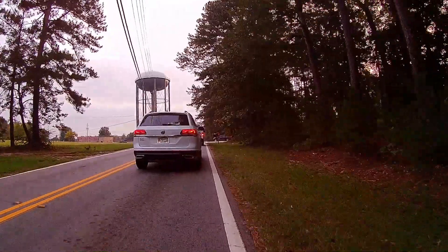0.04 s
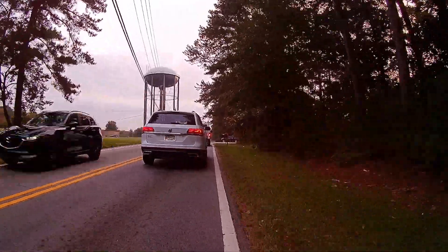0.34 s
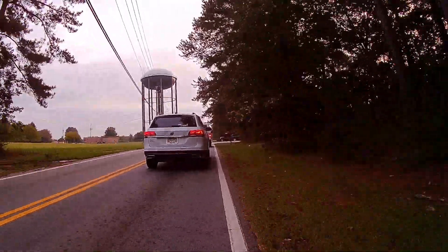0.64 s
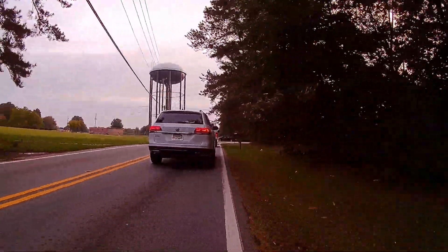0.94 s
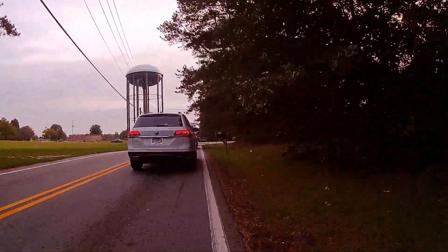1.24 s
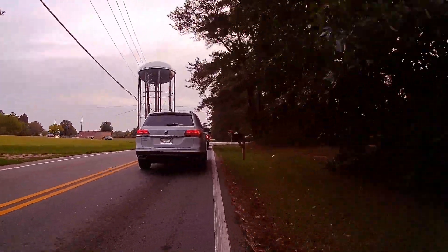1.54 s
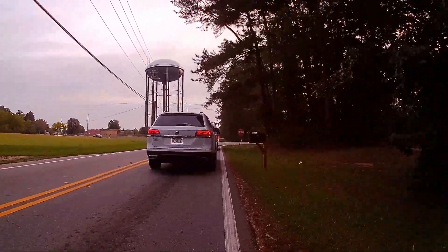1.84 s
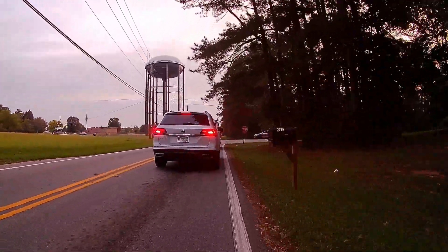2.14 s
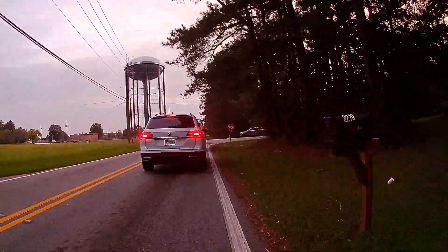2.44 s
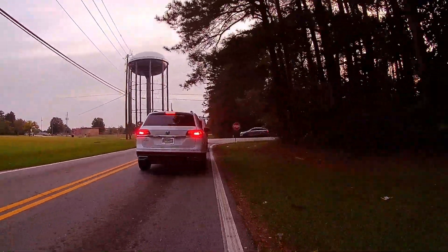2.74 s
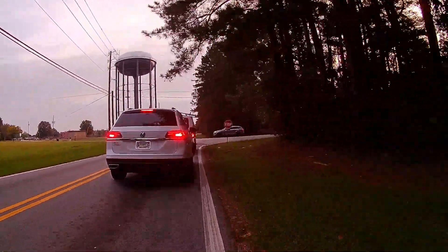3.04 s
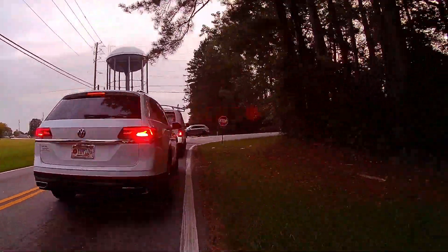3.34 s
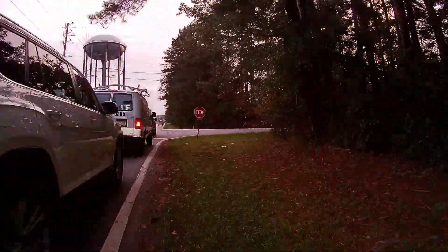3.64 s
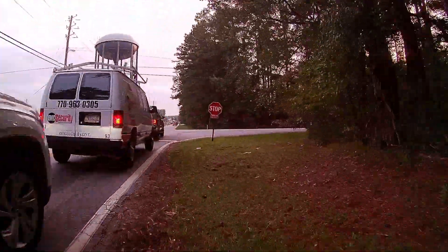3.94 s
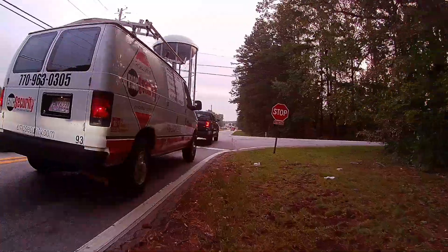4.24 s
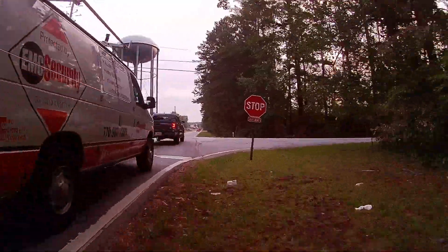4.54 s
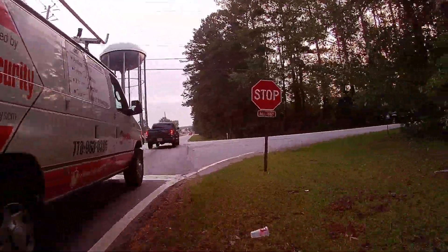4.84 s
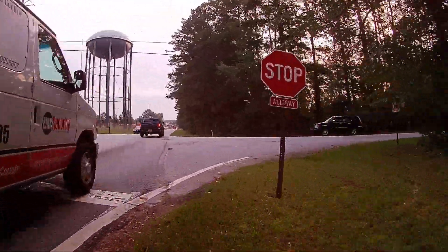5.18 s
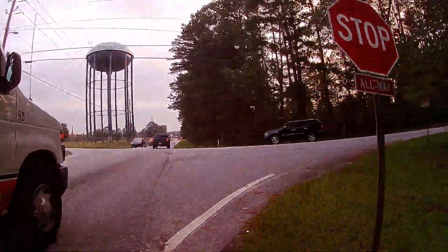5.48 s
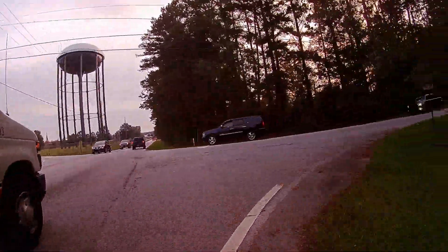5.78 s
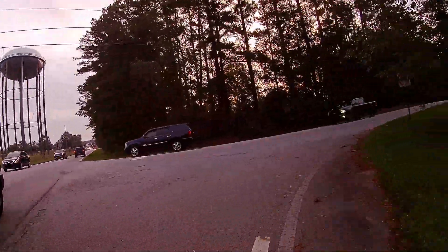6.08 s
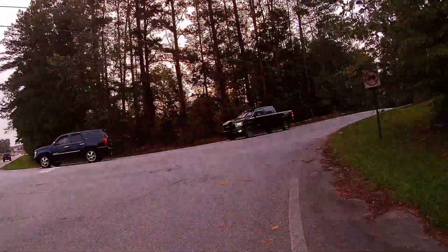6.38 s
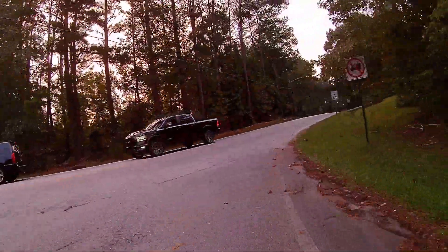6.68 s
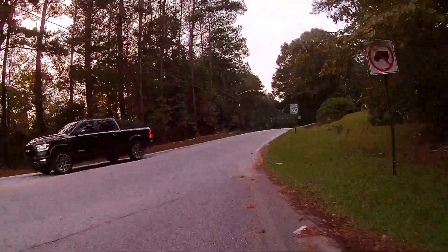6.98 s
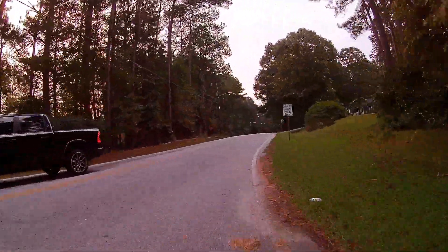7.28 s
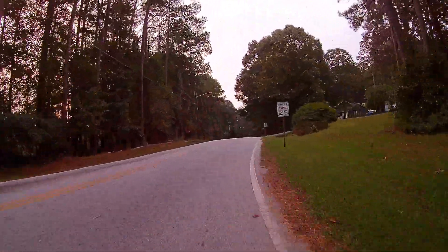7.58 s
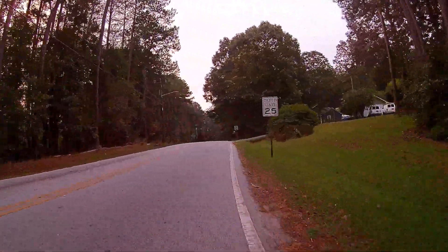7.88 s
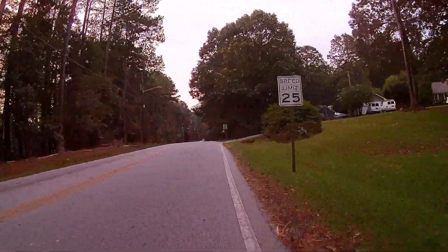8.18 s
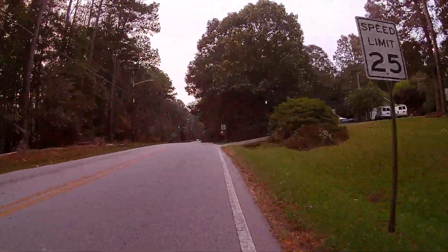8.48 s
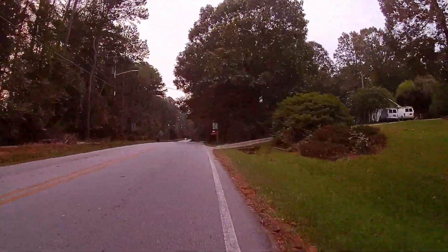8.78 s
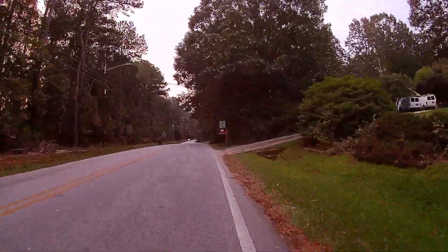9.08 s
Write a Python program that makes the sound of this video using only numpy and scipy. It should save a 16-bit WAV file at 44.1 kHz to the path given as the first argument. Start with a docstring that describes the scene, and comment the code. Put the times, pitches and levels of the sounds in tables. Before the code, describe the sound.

Wind rumbles on the microphone of a rolling bicycle that knocks and rattles over bumps, with tyres humming and cars idling low nearby.

```python
"""Wind buffets a microphone on a rolling bicycle, over the low shaking of the frame and the hum of tyres.
Road grain drives the frame, grit ticks against it, and the camera case knocks amid short bright clicks.
The bicycle slows, coasts over a grass verge past idling cars with its freewheel rattling, then
speeds up on asphalt. Far tyres wash, a distant bird chirps, and a fast limiter flattens each swell."""
import sys
import numpy as np
from scipy import signal
from scipy.fft import rfft, irfft, next_fast_len
from scipy.io import wavfile
from scipy.ndimage import uniform_filter1d

SR = 44100
rng = np.random.default_rng(int(sys.argv[2]) if len(sys.argv) > 2 else 0)


def master(y):
    """Save y as 16-bit WAV."""
    cut = np.clip(np.atleast_2d(y).T, -1, 1)
    pcm = np.round(cut * 32767)  # scale
    wavfile.write(sys.argv[1], SR, pcm.astype(np.int16))


N = 406595
TIME = np.arange(N) / SR
CRUISE_HZ = 154   # tread rate at cruising speed
# Resonances of the camera case. Each row: frequency in Hz, gain in dB, 60 dB decay time in seconds.
CASE_MODES = [(350, -8, .02), (790, -1.5, 0.019), (879, 8, 0.023), (1378, 10.5, 0.013), (1454, 4, 0.029),
              (2010, -8, 0.02), (2450, -15, 0.012), (2900, -16, 0.027), (4600, -20.5, 0.024)]


def from_db(db):
    """Decibels to amplitude ratio."""
    return 10 ** (np.asarray(db) / 20)


def rms_one(x):
    """Scale to unit rms."""
    return x / np.sqrt(np.mean(x ** 2) + 1e-20)


def loudest_one(x):
    """Scale a burst so that its loudest three milliseconds have unit rms."""
    return x / np.sqrt(uniform_filter1d(x ** 2, 132).max())


def in_time(rows):
    """Interpolate each column of a curve at every sample."""
    s, *columns = np.transpose(rows)
    return [np.interp(TIME, s, c) for c in columns]


def swells(rows):
    """Summed power of bell-shaped swells, each at half power at the edges of its width."""
    return sum(from_db(db) ** 2 * 2 ** -((2 * (TIME - s) / width) ** 2) for s, width, db in rows)


def scatter(shape):
    """Gaussian draws limited to two standard deviations."""
    return np.clip(rng.standard_normal(shape), -2, 2)


def drift(corner_hz):
    """Low-passed random fluctuation of unit rms."""
    hz = np.arange(N // 2 + 1) * SR / N
    return rms_one(irfft(rfft(rng.standard_normal(N)) / (1 + (hz / corner_hz) ** 4), N))


def coloured(x, spectrum):
    """Filter by a spectral envelope that rolls off beyond its ends; unit rms."""
    hz, db = np.transpose(spectrum)
    size = next_fast_len(N + SR // 4)
    bins = np.maximum(np.arange(size // 2 + 1) * SR / size, 1)
    gain = from_db(np.interp(np.log(bins), np.log(hz), db))
    skirts = np.minimum(1, bins / hz[0]) * np.minimum(1, hz[-1] / bins) ** 2
    return rms_one(irfft(rfft(x, size) * gain * skirts, size)[:N])


def noise(spectrum):
    """Coloured Gaussian noise of unit rms."""
    return coloured(rng.standard_normal(N), spectrum)


def evened(x, seconds):
    """Steady a noise by dividing it by its running rms."""
    size = max(int(seconds * SR), 1)
    return x / np.sqrt(uniform_filter1d(uniform_filter1d(x ** 2, size), size) + 1e-9)


def ring(force, modes):
    """Modal response: each mode is a damped harmonic oscillator."""
    out = 0
    for hz, db, t60 in modes:
        r, w = np.exp(-np.log(1000) / (t60 * SR)), 2 * np.pi * hz / SR
        out += from_db(db) * signal.lfilter([0, np.sin(w)], [1, -2 * r * np.cos(w), r * r], force + 1e-18)
    return out


def decaying(impulses, seconds):
    """Give each impulse an exponential tail."""
    return signal.lfilter([1], [1, -np.exp(-1 / (seconds * SR))], impulses + 1e-18)


def cut(x, hz, kind, order=2):
    """Causal low-pass or high-pass."""
    return signal.sosfilt(signal.butter(order, hz, kind, fs=SR, output="sos"), x)


def add(out, s, sound):
    """Mix a short sound in at s seconds."""
    at = int(s * SR)
    out[at:at + len(sound)] += sound[:N - at]


def tread_hz():
    """Tread blocks meet the ground at a rate proportional to speed."""
    # Each row: time in seconds, tread rate in Hz.
    speed = [(0, 155.4), (1.05, 148.9), (2, 139), (2.7, 132.6), (3.4, 133.6), (4.9, 120), (5.65, 90.1),
             (6.0, 116.3), (6.5, 129.3), (7.1, 155.5), (7.9, 167.9), (8.4, 179), (8.85, 182.1), (9.22, 192)]
    return in_time(speed)[0]


def on_grass(start_s=3.58, end_s=5.86, entry_s=0.26, exit_s=0.29):
    """Crossfade of the ground: 0 on asphalt, 1 on the verge."""
    return np.clip(.5 + np.minimum((TIME - start_s) / entry_s, (end_s - TIME) / exit_s), 0, 1)


def rolling(cruise_db, doubling_db, grass_db=0):
    """Gain of a rolling noise: a power law of speed, cushioned by grass."""
    return from_db(cruise_db + doubling_db * np.log2(tread_hz() / CRUISE_HZ) + grass_db * on_grass())


def wind(headwind_db=-52.5, buffet_gain_db=5.0, flutter_hz=1.2):
    """Turbulent pressure: eddies push on the microphone while the frame shakes at its low resonance."""
    # Spectra of the eddies and the frame. Each row: frequency in Hz, relative density in dB.
    buffet_spectrum = [(8, -16), (16, 6.5), (26, 1), (32, 1), (39, 10.5), (47, -1), (70, -28.5),
                       (150, -56.5)]
    shake_spectrum = [(25, -27), (40, -29), (48, -6), (54, -1), (60, -5.5), (72, -11.5), (90, -21),
                      (160, -50.5)]
    # Each row: centre in seconds, width in seconds, relative level in dB.
    gusts = [(0.45, 1.5, -45), (1.1, 0.21, -44.5), (3.6, 0.33, -37), (4.8, 1.02, -35.5), (6.1, 0.28, -38.5),
             (7.55, 1.4, -41), (8.25, 0.29, -53.5), (9.2, 0.23, -35.5)]
    # Each row: time in seconds, mean level of the frame's shaking in dB.
    shaking = [(0, -36), (0.6, -35.5), (0.95, -29), (1.3, -41), (2.1, -38), (2.9, -36.5), (3.3, -38),
               (5.6, -39), (6.1, -34.5), (6.45, -34), (7.2, -34), (7.8, -34), (8.8, -30.5), (9.22, -38)]
    strength = np.sqrt(from_db(headwind_db) ** 2 + swells(gusts))
    shake_db, = in_time(shaking)
    buffet = evened(noise(buffet_spectrum), seconds=0.25)
    shake = evened(noise(shake_spectrum), seconds=0.15)
    buffet *= strength * from_db(buffet_gain_db + drift(flutter_hz))
    shake *= from_db(shake_db + 1.5 * drift(flutter_hz))
    return buffet + shake


def grit(per_s, spread_db, clump_db):
    """Shot noise: tiny random impacts of the road grain, their strength swelling in clumps."""
    impacts = (rng.random(N) < per_s / SR) * rng.standard_normal(N)
    return impacts * from_db(spread_db * rng.standard_normal(N) + clump_db * drift(72))


def road():
    """Forced vibration: road grain drives the frame and hollow camera case, harder on rough ground."""
    # Three bands of vibration. Each row: frequency in Hz, relative density in dB.
    rumble_spectrum = [(55, -22), (85, -4), (115, -1.5), (160, -1), (210, -8), (280, -21), (500, -43.5)]
    drone_spectrum = [(150, -15.5), (210, -9), (255, -2.5), (295, -5), (335, -1.5), (375, -6.5),
                      (425, -9.5), (480, -21), (600, -29.5), (900, -26), (2000, -74.5)]
    buzz_spectrum = [(400, -17), (620, -16.5), (740, 0), (840, 5), (930, -16), (1050, -5), (1350, -2.5),
                     (1650, -4.5), (1850, -23), (2250, -25), (2600, -35), (3200, -40), (3750, -39),
                     (4200, -51), (5000, -41.5), (9000, -52.5)]
    # Each row: centre in seconds, width in seconds, added vibration in dB relative to smooth road.
    rough_patches = [(3.05, 1, -1.5), (4.6, 0.7, 3.5), (5.15, 0.57, 5), (8.55, 0.27, 3.5)]
    rumble = evened(noise(rumble_spectrum), seconds=0.83)
    drone = evened(coloured(grit(3000, spread_db=2.5, clump_db=2.5), drone_spectrum), seconds=0.49)
    buzz = evened(coloured(grit(2500, spread_db=-0.5, clump_db=3.5), buzz_spectrum), seconds=0.096)
    rumble *= rolling(cruise_db=-47.5, doubling_db=5, grass_db=-7.5)
    drone *= rolling(cruise_db=-41.5, doubling_db=14, grass_db=-2.4)
    buzz *= rolling(cruise_db=-56.5, doubling_db=13, grass_db=-2)
    return np.sqrt(1 + swells(rough_patches)) * (rumble + drone + buzz)


def tyre_hum(wobble=0.02, rough=0.4, swell_db=2.0):
    """Periodic tread impacts make a tone; uneven asphalt modulates it and grass silences it."""
    # Each row: time in seconds, relative levels of the fundamental and of its octave in dB.
    hum_levels = [(0, -47.5, -65), (0.85, -46, -64), (1, -37.5, -55.5), (1.3, -51.5, -52.5),
                  (1.45, -37, -55), (2.0, -39.5, -44), (2.12, -48.5, -49.5), (2.5, -45, -54.5),
                  (3.05, -50, -48.5), (3.4, -51.5, -57), (6.45, -53.5, -59), (6.7, -45.5, -59.5),
                  (7.2, -46.5, -58.5), (7.7, -48.5, -66), (7.9, -46.5, -54), (8.6, -35, -44.5),
                  (9.22, -38, -62)]
    first_db, octave_db = in_time(hum_levels)
    phase = 2 * np.pi * np.cumsum(tread_hz() * (1 + wobble * drift(18.95))) / SR
    first_gain = from_db(first_db - 1 + swell_db * drift(4.5))
    sidebands = rough * (drift(16) * np.cos(phase) + drift(27) * np.sin(phase))
    first = first_gain * (np.sin(phase) + sidebands)
    octave = from_db(octave_db + 4.5) * (1 + rough * drift(23)) * np.sin(2 * phase)
    return np.sqrt(2) * (first + octave) * (1 - on_grass())


def crunch(snaps_per_s=45, spread_db=6.5, snap_s=0.0046, rustle=0.09):
    """Brittle fracture: stalks and gravel snap under the tyres in noise bursts over a steady rustle."""
    # Each row: frequency in Hz, relative density in dB.
    spectrum = [(900, -2.5), (2000, 10), (2700, 4.5), (4200, -4), (5500, -9.5), (7000, -12), (10000, -18.5),
                (15000, -17)]
    # Patches of twigs and gravel. Each row: centre in seconds, width in seconds, level in dB.
    litter = [(4.1, 0.15, -62), (4.57, 0.58, -63), (2.7, 0.56, -80), (5.28, 0.12, -69)]
    dust = rolling(cruise_db=-77.5, doubling_db=14, grass_db=-1)
    strength = np.sqrt(dust ** 2 + swells(litter))
    snaps = (rng.random(N) < snaps_per_s / SR) * from_db(spread_db * scatter(N))
    envelope = decaying(snaps, snap_s) + rustle
    return strength * evened(envelope * noise(spectrum), seconds=1.0)


def engines(firing_hz=46, at_one_metre_db=-39, slope_db=-21.5):
    """Idling cars hum at harmonics of their firing rate, weakened by spherical spreading."""
    # Each row: time in seconds, distance to the nearest engine in metres.
    distances = [(0, 21), (3, 12), (4.6, 1.5), (5.6, 2.7), (7, 18), (9.22, 16)]
    metres, = in_time(distances)
    phase = 2 * np.pi * np.cumsum(firing_hz * (1 + 0.016 * drift(0.94))) / SR
    hum = sum(from_db(slope_db * np.log2(k) + 2 * drift(3.1)) * np.sin(k * phase) for k in range(1, 7))
    return from_db(at_one_metre_db) * rms_one(hum) / metres


def far_traffic():
    """The tyres of far cars sum incoherently to a steady wash."""
    # Each row: frequency in Hz, relative density in dB.
    spectrum = [(300, 1.5), (600, -9.5), (830, 4.5), (1050, -8), (1550, -4.5), (1900, -20), (4000, -30)]
    return from_db(-64) * noise(spectrum)


def hiss():
    """Stationary broadband noise forms a faint floor."""
    # Each row: frequency in Hz, relative density in dB.
    spectrum = [(100, -2.5), (2000, -6), (4000, -14.5), (8000, -16.5), (15000, -11.5)]
    return from_db(-82) * noise(spectrum)


def stones(per_s=22, spread_db=5.5, large_gain_db=8.0, skitter=0.1, skitter_s=.002):
    """Impulse excitation: grains flung off the tyres tick, skitter on the frame and ring the case."""
    # Each row: time in seconds, relative strength in dB.
    large_stones = [(0.143, -50), (0.258, -51.5), (0.663, -53), (0.817, -48.5), (1.164, -51.5),
                    (1.278, -53), (1.73, -49), (1.773, -46), (2.012, -49), (2.107, -54), (2.181, -54),
                    (6.554, -48), (6.687, -49), (6.922, -56.5), (7.328, -50), (7.36, -50), (7.625, -43.5),
                    (7.668, -44.5), (7.872, -50), (7.935, -57), (8.089, -45.5), (8.129, -47.5),
                    (8.322, -49.5), (8.672, -45), (8.765, -51), (8.886, -48), (9.042, -46.5),
                    (9.179, -39.5)]
    # Resonances they strike. Each row: frequency in Hz, gain in dB, 60 dB decay time in seconds.
    modes = [(2240, -16.5, 0.021), (3800, -21.5, 0.01), (4700, -22, 0.0061)]
    sizes = rolling(cruise_db=-54.5, doubling_db=14) * from_db(spread_db * scatter(N))
    ticks = (rng.random(N) < per_s / SR) * sizes
    for s, db in large_stones:
        add(ticks, s, from_db([db + large_gain_db]))
    ticks += skitter * rng.standard_normal(N) * decaying(ticks, skitter_s)
    bright = cut(cut(ticks + ring(ticks, modes), 1500, "high"), 6000, "low", order=1)
    return bright + from_db(-24) * ring(ticks, CASE_MODES)


def bird(pitch_hz=6500, fall=0.15, trill_depth=0.08, trill_hz=190, echo_db=-13, echo_s=0.03):
    """Frequency modulation makes thin, sagging chirps buzz; the trees return one echo."""
    # Each row: start in seconds, length in seconds, peak level in dB.
    chirps = [(0.322, 0.016, -70.5), (0.392, .036, -79), (0.786, 0.04, -72), (1.999, .036, -76.5),
              (2.522, 0.042, -77), (2.603, 0.04, -81), (3.398, .036, -73)]
    out, waver = np.zeros(N), 0.047 * drift(400)
    for s, length, db in chirps:
        t = TIME[:int(length * SR)]
        trill = trill_depth * np.sin(2 * np.pi * trill_hz * t)
        hz = pitch_hz * (1 - fall * (t / length) ** 2 + trill + waver[int(s * SR):][:len(t)])
        envelope = from_db(db) * np.sqrt(np.abs(np.sin(np.pi * t / length)))
        chirp = envelope * np.sin(2 * np.pi * np.cumsum(hz) / SR)
        add(out, s, chirp)
        add(out, s + echo_s, from_db(echo_db) * chirp)
    return out


def knocks(chatter=0.053, detune=0.048, crack_hz=3800, crack_rise_s=0.00039, crack_octaves=0.23):
    """Knocks on the case and short bright clicks: damped modes clack and a noise burst adds a crack."""
    # Each row: start in seconds, chatter decay time in seconds, clack level in dB, crack level in dB.
    events = [(0.56, 0.002, -49, -60.5), (1.335, 0.0031, -54, -64), (2.069, 0.0011, -46.5, -58.5),
              (2.232, 0.003, -42.5, -69), (2.4177, .004, -41.5, -64), (2.562, 0.004, -41, -66),
              (2.706, 0.0034, -46, -74), (2.822, .004, -42, -71), (2.87, 0.0043, -50, -60),
              (3.017, 0.0046, -49, -77), (3.051, 0.0025, -40.5, -79), (3.081, .003, -40, -82),
              (3.101, 0.0083, -39, -66), (3.397, .003, -41, -63), (3.448, 0.0025, -45, -75),
              (3.584, .003, -39, -70), (3.544, 0.0017, -39.5, -54), (3.624, 0.012, -30.5, -53.5),
              (3.744, 0.0033, -39, -78), (3.906, 0.0035, -46, -60), (3.937, 0.005, -39, -71),
              (3.998, 0.0035, -38, -69), (4.076, 0.0023, -62, -78), (4.11, 0.0018, -50, -72),
              (4.142, 0.0023, -51, -56), (4.336, 0.0039, -42, -56), (4.357, 0.0033, -44, -64),
              (4.458, 0.0051, -28, -60), (4.543, 0.0028, -34.5, -67), (4.571, 0.0052, -35, -51),
              (4.585, 0.0025, -46, -56), (4.603, 0.0035, -26, -62), (4.618, 0.0042, -31, -59),
              (4.639, .004, -44, -69), (4.663, 0.0025, -45, -71), (4.721, 0.0033, -38.5, -53),
              (4.748, 0.003, -30, -51), (4.775, 0.011, -35.5, -64), (4.816, 0.0012, -27.5, -42),
              (4.874, 0.0045, -33.5, -60), (4.901, 0.0036, -41, -64), (4.923, 0.0036, -33.5, -54),
              (4.994, 0.0027, -42, -72), (5.017, 0.0036, -41, -65), (5.155, 0.0033, -43, -72),
              (5.2067, 0.0037, -43, -56), (5.222, 0.0022, -50, -57), (5.238, 0.0035, -49, -55),
              (5.283, .002, -47, -64), (5.41, 0.0022, -55, -59), (5.459, 0.015, -31.5, -63),
              (5.5225, 0.0068, -42, -78), (5.67, 0.0027, -30, -48.5), (5.725, .003, -46.5, -67),
              (5.798, 0.0031, -41, -74), (5.828, 0.0027, -45, -75), (5.892, 0.0083, -40.5, -74),
              (5.949, 0.0045, -42.5, -78), (5.998, 0.0031, -45.5, -69), (6.184, 0.0025, -42, -74),
              (6.378, 0.0038, -43.5, -66), (7.024, 0.0018, -53, -61), (7.486, 0.0053, -30, -51.5),
              (8.395, 0.012, -29, -41.5), (8.406, 0.0061, -26.5, -50), (8.441, 0.016, -33, -58),
              (8.508, 0.012, -37.5, -74), (8.61, 0.0055, -26, -50.5), (8.618, 0.0057, -35.5, -57)]
    out, t, grain = np.zeros(N), TIME[:SR // 20], rng.standard_normal(N + SR)
    for (s, decay_s, clack_db, crack_db), (pitch, brightness) in zip(events, scatter((len(events), 2))):
        rattle = grain[int(s * SR):][:len(t)] * np.exp(-t / decay_s)
        excitation = (t == 0) + chatter * rattle
        modes = [(hz * (1 + detune * pitch), db, t60) for hz, db, t60 in CASE_MODES]
        clack = loudest_one(cut(cut(ring(excitation, modes), 300, "high"), 3600, "low"))
        burst = rattle * (1 - np.exp(-t / crack_rise_s)) * np.exp(-t / (1.7 * decay_s))
        top_hz = crack_hz * 2 ** (crack_octaves * brightness)
        crack = loudest_one(cut(cut(burst, 1100, "high"), top_hz, "low", order=1))
        add(out, s, from_db(clack_db) * clack + from_db(crack_db) * crack)
    return out


def freewheel(ticks_per_s=57, spread_db=2.5, weak_pawl_db=-4, slide_s=0.0013, scuff=0.01, fade_s=0.4):
    """Friction excites the hub's modes as two unequal pawls rub and slip off the teeth in turn."""
    # Each row: start in seconds, end in seconds, level at cruising speed in dB.
    coasts = [(2.092, 5.69, -52.5), (5.636, 6.55, -61.5), (9.041, 9.6, -45)]
    # Hub and frame. Each row: frequency in Hz, gain in dB, 60 dB decay time in seconds.
    hub_modes = [(720.9, -3, 0.029), (1130, -6, 0.035), (1346, 3, 0.026), (1417, 4, 0.022),
                 (1550, 0.5, 0.023), (1640, -4, 0.024), (2520, -13, 0.006), (3050, -18, 0.0088),
                 (3752, -19.5, 0.042)]
    coasting = sum(from_db(db) * np.clip(np.minimum(TIME - start, end - TIME) / fade_s, 0, 1)
                   for start, end, db in coasts)
    teeth = np.floor(np.cumsum(ticks_per_s * np.exp(0.2 * drift(40))) / SR)
    ticks = np.diff(teeth, prepend=0) * from_db(weak_pawl_db * (teeth % 2) + spread_db * scatter(N))
    age = TIME[:SR // 50] / slide_s
    slides = signal.fftconvolve(ticks, age * np.exp(-age))[:N]
    friction = (slides + scuff) * rng.standard_normal(N)
    ringing = sum(ring(friction * (-1) ** k, [mode]) for k, mode in enumerate(hub_modes))
    muffled = cut(cut(ringing, 680, "high"), 3500, "low", order=4)   # the frame passes little treble
    return coasting * rolling(cruise_db=0, doubling_db=-0.5) * evened(muffled, seconds=0.14)


def puffs():
    """Flow noise: sharp eddies hiss briefly across the microphone port."""
    # Each row: centre in seconds, width in seconds, level in dB.
    eddies = [(2.925, .03, -77), (8.47, 0.016, -61), (8.555, .016, -55), (8.607, 0.019, -61)]
    # Each row: frequency in Hz, relative density in dB.
    spectrum = [(1000, -8), (3000, 4), (7500, -0.5), (11000, -6), (15000, -9)]
    return np.sqrt(swells(eddies)) * noise(spectrum)


def jolts(t60=0.062, rise_s=0.0032, gain_db=4.0):
    """Damped free vibration: hard bumps set the frame thudding in three inharmonic modes."""
    # Each row: start in seconds, main frequency in Hz, relative level in dB.
    thuds = [(3.624, 411, -26.5), (3.667, 463, -37.5), (3.74, 476, -38), (4.459, 350, -28.5),
             (4.477, 253, -26), (4.616, 388, -30.5), (4.744, 350, -38), (4.813, 389, -29.5),
             (4.84, 318, -42), (5.307, 312, -38), (5.462, 300, -22.5), (5.668, 360, -34.5),
             (8.395, 333, -18.5), (8.433, 371, -21), (8.508, 386, -31), (8.603, 223, -33.5),
             (8.615, 307, -21)]
    out, t = np.zeros(N), TIME[:SR // 8]
    for s, hz, db in thuds:
        for ratio, mode_db in (0.7, -9), (1, 0), (1.93, -10):
            fade = from_db(-60 * t * ratio / t60) * (1 - np.exp(-t / rise_s))   # high modes die sooner
            add(out, s, from_db(db + gain_db + mode_db) * fade * np.sin(2 * np.pi * hz * ratio * t))
    return out


def scene():
    """Superposition of all sources at a single microphone."""
    bicycle = road() + tyre_hum() + crunch() + stones() + freewheel() + knocks() + jolts()
    background = hiss() + engines() + far_traffic()
    return (bicycle + background + wind() + puffs() + bird())[None]


def record(dry, ceiling_db=-28.5, release_db_per_s=177.5, detector_s=0.00045):
    """Peak limiting: swells are clamped, sharp clacks slip past and clip; sub-bass and top are cut."""
    sensed = uniform_filter1d(dry, int(detector_s * SR), axis=-1)
    over_db = np.maximum(20 * np.log10(np.abs(sensed) + 1e-9) - ceiling_db, 0)
    recovered_db = release_db_per_s * TIME
    duck_db = np.maximum.accumulate(over_db + recovered_db, axis=-1) - recovered_db
    overload = from_db(ceiling_db - 0.4)
    clipped = np.clip(dry * from_db(-duck_db), -overload, overload)
    centred = cut(clipped, 4.4, "high", order=1)
    soft_ends = np.clip(np.minimum(TIME, TIME[-1] - TIME) / .006, 0, 1)
    dulled = cut(centred * soft_ends, 6850, "low", order=1)
    return signal.sosfilt(signal.cheby2(12, 70, 17000, fs=SR, output="sos"), dulled)


dry = scene()
out = record(dry)
master(out)
```